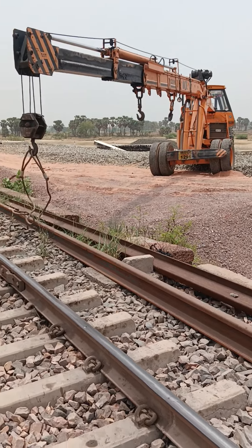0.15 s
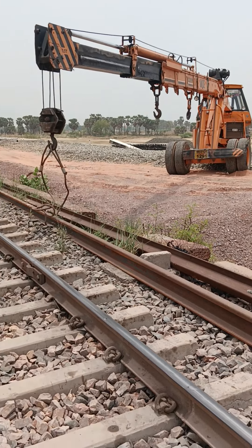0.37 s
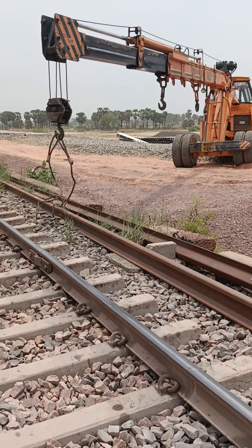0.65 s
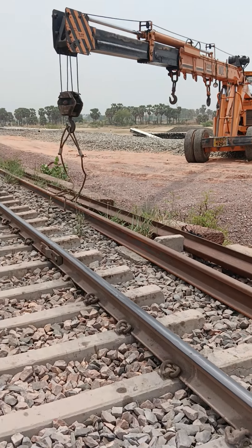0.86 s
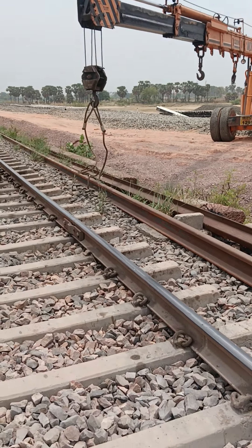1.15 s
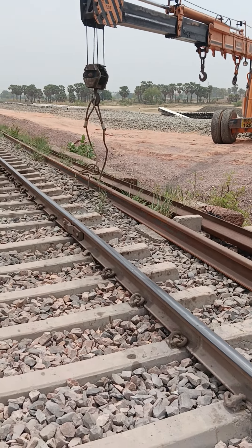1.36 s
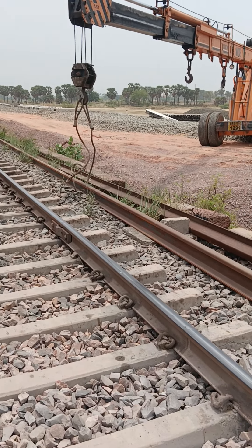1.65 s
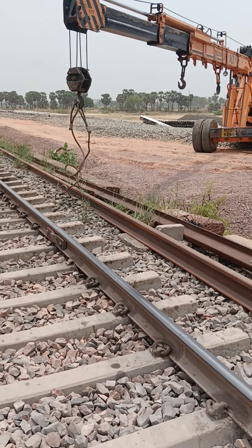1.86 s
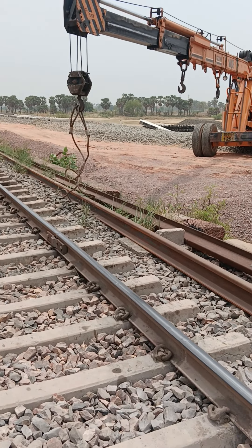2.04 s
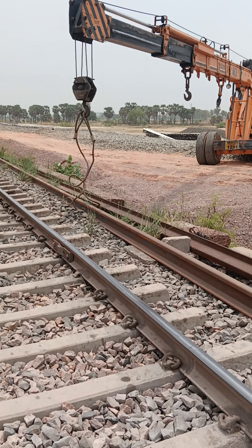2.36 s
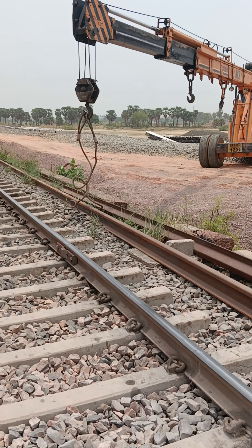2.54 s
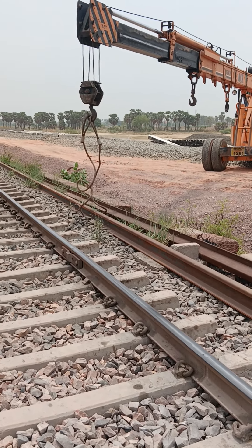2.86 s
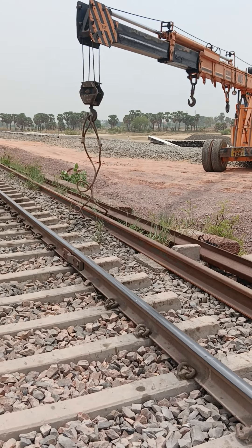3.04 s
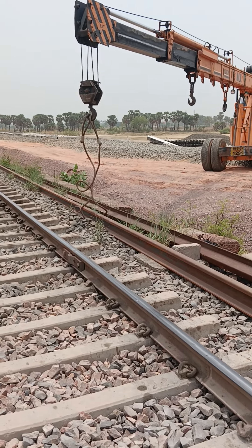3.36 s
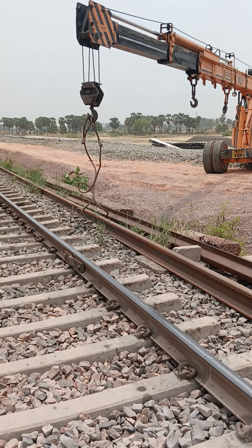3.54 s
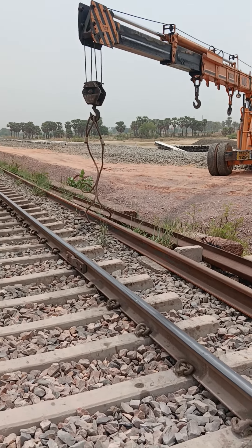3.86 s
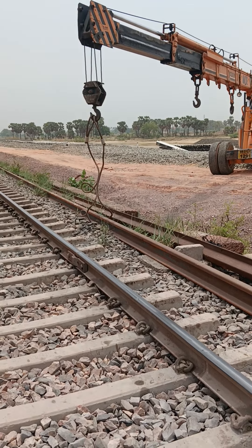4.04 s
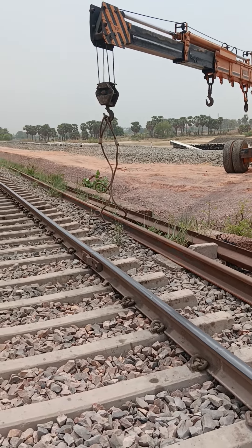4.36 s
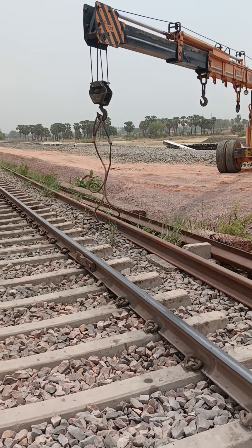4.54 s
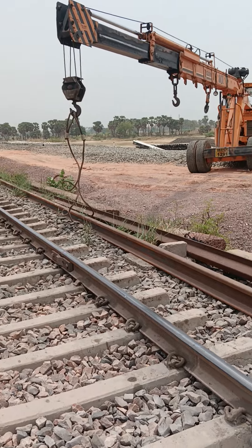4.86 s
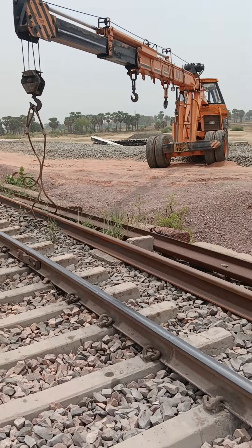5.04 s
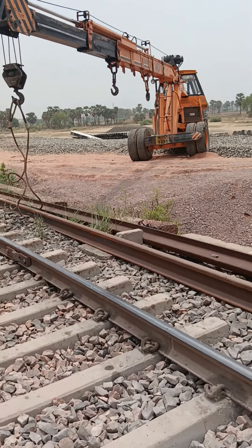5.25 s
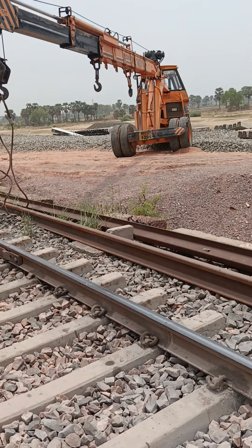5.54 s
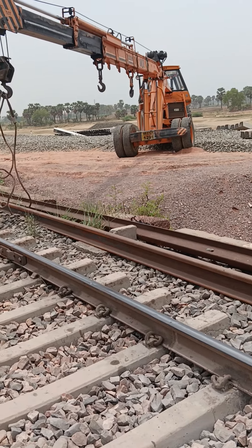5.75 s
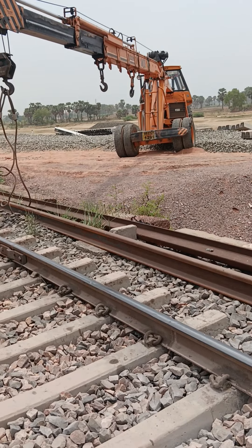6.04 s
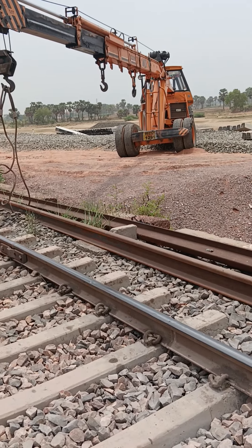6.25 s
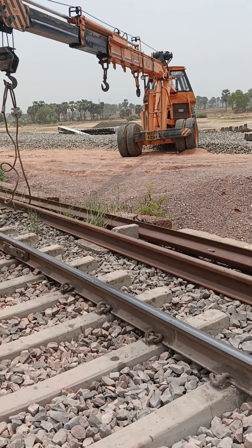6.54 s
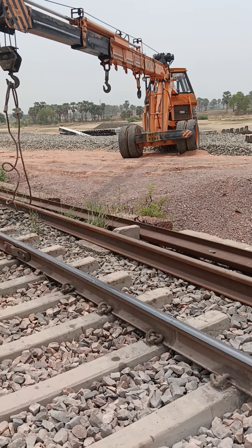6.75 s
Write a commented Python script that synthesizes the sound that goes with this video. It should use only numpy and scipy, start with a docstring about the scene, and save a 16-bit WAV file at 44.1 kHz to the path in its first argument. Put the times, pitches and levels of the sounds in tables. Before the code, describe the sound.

A four-cylinder diesel crane idles throughout, outdoors beside a railway track, somewhat to the right. A low exhaust hum near 74 Hz sits under fast, uneven knocking and ticking, about 37 bursts a second, with loose covers rattling. At 0.15-0.3 s gliding low wind puffs thump the left side, with a faint rustle and a soft dull bump at 0.3 s. At 1.05-1.25 s a ballast stone lands close by: a light touch, a very loud sharp crack at 1.07, a second clack at 1.19 and small tinks, dry and brief. Steady idling follows, with a thin high sizzle around 2-4 s, light wind, and occasional panel rings. A short rising metallic chirp comes at 4.5 s, then harder knocks at 4.7. Everything cuts to silence from 5.62 to 5.88 s, then the idle resumes with scattered knocks and rings until about 6.9 s.

```python
"""A four-cylinder crane diesel idles throughout: low exhaust sines under knocking, ticking bursts of noise.
Covers rattle throughout and ring now and then. A light wind buffets the two microphone ports;
early on, gliding low puffs and a soft bump stand out.
Just after one second a ballast stone clacks close by: sharp cracks with a brief modal ring and small tinks.
Later, a panel rings briefly with a rising tone, and the sound cuts out for a quarter of a second."""
import sys
import numpy as np
from scipy import signal
from scipy.fft import rfft, irfft, next_fast_len
from scipy.io import wavfile
from scipy.ndimage import uniform_filter1d, map_coordinates

SR = 44100
rng = np.random.default_rng(int(sys.argv[2]) if len(sys.argv) > 2 else 0)


def transcribe(u):
    """Save the signal u as a 16-bit wav file named by the first command-line argument.

    u: samples, shape (n,) or (channels, n), limited to [-1, 1]; the rate is SR.
    q: integer samples, one column per channel.
    """
    v = np.clip(np.atleast_2d(u).T, -1, 1)
    q = np.round(v * 32767).astype(np.int16)
    wavfile.write(sys.argv[1], SR, q)


N = 304192  # samples, about 6.9 s


def amp(db):
    """Decibels to gain."""
    return 10 ** (np.asarray(db) / 20)


def unit(x):
    """Scale to rms 1."""
    return x / np.sqrt(np.mean(x ** 2) + 1e-20)


def along(points, hz):
    """Read a curve of (frequency, value) points on a log frequency axis."""
    point_hz, value = np.transpose(points)
    return np.interp(np.log(hz + 1), np.log(point_hz + 1), value)


def clock():
    """The time of each sample in seconds."""
    return np.arange(N) / SR


def curves(rows):
    """One value per sample for each column after the time."""
    time_s, *columns = np.transpose(rows)
    return [np.interp(clock(), time_s, column) for column in columns]


def wobble(rate):
    """A smooth random curve with the given number of random knots a second."""
    knots = rng.standard_normal(int(N * rate / SR) + 4)
    return map_coordinates(knots, [np.arange(N) * rate / SR])


def coloured(x, gain_db, delay=0):
    """Filter x causally (minimum phase) by a dB curve over frequency, then delay it by some seconds."""
    m = 2 * next_fast_len(N // 2 + 8192)
    hz = np.fft.rfftfreq(m, 1 / SR)
    cepstrum = irfft(np.log(amp(gain_db(hz)) + 1e-6), m)
    # folding the cepstrum onto positive time gives the minimum phase
    cepstrum[1:m // 2] *= 2
    cepstrum[m // 2 + 1:] = 0
    response = np.exp(rfft(cepstrum) - 2j * np.pi * hz * delay)
    return irfft(rfft(x, m) * response, m)[..., :N]


def noise(spectrum, channels=2):
    """Unrelated noises with the given colour, scaled together to rms 1."""
    white = rng.standard_normal((channels, N))
    return unit(coloured(white, lambda hz: along(spectrum, hz)))


def even(x):
    """Noise with its own quick swells levelled out."""
    power = np.abs(uniform_filter1d(x ** 2, size=900, axis=-1))
    return x / np.sqrt(power + .02)


def fade(age_s, t60_s):
    """Exponential decay by 60 dB in t60_s."""
    return np.exp(-np.log(1000) * age_s / t60_s)


def decay(start_s, t60_s):
    """An envelope that jumps to 1 and dies away, down to a floor of -120 dB."""
    age = clock() - start_s
    return (age >= 0) * fade(np.clip(age, 0, 2 * t60_s), t60_s)


def swell(centre_s, half_s):
    """A bell-shaped envelope around a moment."""
    return np.exp(-((clock() - centre_s) / half_s) ** 2 / 2)


def fuzzy(hz, width_hz):
    """A narrow band of noise of rms 1 around a fixed or moving centre."""
    turn = 2 * np.pi * np.cumsum(hz * np.ones(N)) / SR
    return unit(wobble(width_hz) * np.sin(turn) + wobble(width_hz) * np.cos(turn))


# colour of the open-air background: pitch_hz, level_db
AIR_COLOUR = [(25, 1), (100, -2.5), (250, 1.5), (500, -5), (1400, -4), (3000, -7.5), (6500, -12.5),
              (9000, -24), (13500, -35), (15500, -26)]


def air(level_db=-60):
    """The open-air background is a steady coloured noise, unrelated at the two ports."""
    return amp(level_db) * noise(AIR_COLOUR)


# faint high rustles: centre_s, half_length_s, level_db
RUSTLE_MOVES = [(.281, .0031, -49.5), (.38, .008, -59), (1.24, .012, -65.5), (1.474, .0059, -54.5),
                (1.778, .02, -55.5), (4.68, .005, -63.5)]
# colour of the rustling: pitch_hz, level_db
RUSTLE_COLOUR = [(3000, -29), (9000, -8.5), (13000, -19.5), (15000, 1.5)]


def rustle():
    """Fingers shift lightly on the microphone case, catching unevenly: short swells of rough hiss."""
    moves = sum(amp(db) * swell(s, half) for s, half, db in RUSTLE_MOVES)
    return moves * unit(amp(4 * wobble(250)) * noise(RUSTLE_COLOUR))


# colour of the light breeze at the ports: pitch_hz, level_db
BREEZE_COLOUR = [(25, -26), (48, -24.5), (68, 7), (125, 2.5), (200, -5), (350, -13.5), (800, -62),
                 (3000, -100)]
# colour of the eddies on the puffs: pitch_hz, level_db
EDDY_COLOUR = [(25, -24), (48, -5), (70, -1.5), (130, 0), (200, -7.5), (350, -26), (800, -57.5),
               (3000, -100)]
# stronger puffs: centre_s, half_length_s, pitch_hz (before the glide), left_db, right_db, eddies_db (relative)
WIND_PUFFS = [(.157, 0.018, 84.8, -38.5, -57, -4), (0.218, 0.015, 74.5, -30.5, -56, -12),
              (0.245, 0.0085, 84, -30, -56, -9), (.275, .015, 130, -46, -63, 0),
              (1.235, .008, 97.2, -35, -49, -13), (1.277, 0.02, 75.75, -33, -44, -9.5),
              (1.308, 0.0068, 109.9, -31.5, -48, -4), (2.25, .04, 110, -63, -55, 1),
              (2.864, .06, 115, -65, -50, -2), (3.904, 0.013, 133.8, -63, -43, 0.5),
              (4.071, 0.017, 105, -56, -54, 1.5), (4.223, 0.018, 171, -64, -57, 0),
              (5.209, .01, 110, -58, -51, 6.5), (5.268, 0.0087, 124.3, -56, -48.5, -2),
              (6.378, 0.012, 105, -41.5, -68, -1.5), (6.523, .016, 120.7, -59, -52.5, 0.5)]


def wind(left_db=-62, right_db=-58, lumps_db=3.0, shared=0.54, glide=0.113, glide_rate=45):
    """A light breeze buffets each port separately; single puffs are gliding low surges with eddies on them."""
    lumps = amp(lumps_db * np.array([wobble(13), wobble(7.3)]))
    breeze = amp([[left_db], [right_db]]) * lumps * noise(BREEZE_COLOUR)
    # the eddies are partly common to both ports
    eddies = even(unit(noise(EDDY_COLOUR) + shared * noise(EDDY_COLOUR, channels=1)))
    turn_per_hz = 2 * np.pi * np.cumsum(1 + glide * wobble(glide_rate)) / SR
    puffs = np.zeros((2, N))
    for s, half, hz, puff_left_db, puff_right_db, eddy_db in WIND_PUFFS:
        surge = np.sqrt(2) * np.sin(hz * turn_per_hz) + amp(eddy_db) * eddies
        puffs += amp([[puff_left_db], [puff_right_db]]) * swell(s, half) * surge
    return breeze + puffs


# colour of a dull bump on the case: pitch_hz, level_db
BUMP_COLOUR = [(40, -6.5), (120, -1), (300, 0.5), (420, -14), (650, -60), (2000, -74)]


def bump(db=-28.5, right_db=-15, start_s=.3145, rise_s=0.011):
    """A soft knock on the case beside the left port: a dull noise that rises quickly and dies away."""
    envelope = decay(start_s, t60_s=0.14) * (1 - decay(start_s, t60_s=rise_s)) ** 2
    return amp(db) * amp([[0], [right_db]]) * envelope * even(noise(BUMP_COLOUR))


# nudged neighbouring stones: start_s, pitch_hz, level_db, t60_s
PEBBLE_TINKS = [(1.089, 3950, -42, .03), (1.093, 1320, -40, .1), (1.148, 2230, -43, .03),
                (1.151, 4390, -46.5, 0.043), (1.189, 2330, -34.5, .03), (1.213, 2480, -45, 0.12),
                (1.24, 3710, -50.5, .08), (1.262, 2560, -52, .05)]


def pebbles(attack_s=.001, left_db=0):
    """Neighbouring stones, nudged by the landing one, tink softly: each is one short decaying sine."""
    tinks = np.zeros(N)
    for s, hz, db, t60 in PEBBLE_TINKS:
        attack = 1 - decay(s, np.log(1000) * attack_s)
        tinks += amp(db) * decay(s, t60) * attack * np.sin(2 * np.pi * hz * clock())
    return amp([[left_db], [0]]) * tinks


# the stone lands, hops and settles: start_s, level_db, lowest_hz, brightest_hz, then relative to level_db:
# ring_db, scatter_db (from the ballast), thud_db (of the bed)
STONE_CONTACTS = [(1.0495, -34, 400, 3010, 1, -21, -15), (1.0732, -10.5, 200, 7470, -2, -28.5, -34),
                  (1.1894, -19, 1200, 3900, -5.5, -27, -25.5), (1.2055, -27, 2000, 3900, -2.5, -16, -34),
                  (1.233, -41.5, 2100, 2700, 2, -16, -29)]
# ring of the stone: pitch_hz, level_db (relative), t60_s
STONE_MODES = [(482, -37, .07), (680, -32, 0.067), (1340, -20.5, 0.031), (2010, -25, 0.043),
               (2316, -13, .03), (2946, -12, .026), (3280, -20.5, .024), (3520, -20.5, .028),
               (3830, -14, .02), (3950, -18.5, .02), (4183, -20, 0.019), (4880, -13, .02),
               (4930, -11.5, 0.019), (5600, -20.5, .019), (5935, -17.5, .022), (7310, -31, 0.02),
               (11300, -7, 0.039), (14300, 9.5, .0248)]
# colour of crack and grit: pitch_hz, level_db
CRACK_COLOUR = [(200, -37), (1000, -31.5), (2200, -9), (2620, -13.5), (3200, 3.5), (4200, -2),
                (5200, -10.5), (6500, -10), (8000, -19), (10000, -26), (15000, -28.5)]
# colour of the scatter from the ballast: pitch_hz, level_db
BALLAST_COLOUR = [(200, -15.5), (500, -0.5), (1300, 2), (2600, 1.5), (4000, -7), (6000, -0.5),
                  (9000, -37.5), (15000, -42.5)]


def stone(crack_db=0, grit_db=-21, lag_s=0.001385, thud_hz=560, thud_t60_s=.035):
    """Each contact is a sharp crack, crushed grit and a brief ring; the ballast thuds and scatters it back."""
    out = np.zeros((2, N))
    t = np.arange(SR // 5) / SR
    crack = coloured(signal.unit_impulse(N), lambda hz: along(CRACK_COLOUR, hz))[:len(t)]
    crack = amp(crack_db) * crack / np.abs(crack).max()
    grit = amp(grit_db) * noise(CRACK_COLOUR)
    scatter = noise(BALLAST_COLOUR) * amp(2.3 * wobble(300))
    scatter_envelope = (t / 0.02 * np.exp(1 - t / 0.016)) ** 3  # the answer builds up, then dies
    for s, db, low_hz, bright_hz, ring_db, scatter_db, thud_db in STONE_CONTACTS:
        span = slice(round(s * SR), round(s * SR) + len(t))
        ring = np.zeros((2, len(t)))
        for hz, mode_db, t60 in STONE_MODES:
            gain = amp(mode_db + rng.normal(0, 1, (2, 1)))
            ring += gain * fade(t, t60) * np.sin(2 * np.pi * (hz * t + rng.random()))
        tail = amp(ring_db) * ring + fade(t, 0.055) * grit[:, span]
        hit = crack + tail * (1 - fade(t, 0.0035))
        hit = hit + amp(scatter_db) * scatter[:, span] * scatter_envelope
        # each contact has its own dullness and thinness
        dull = signal.butter(5, np.clip(bright_hz, 500, SR / 2 - 1), fs=SR, output="sos")
        thin = signal.butter(1, low_hz, "high", fs=SR, output="sos")
        out[:, span] += amp(db) * signal.sosfilt(np.vstack([dull, thin]), hit)
        thud = fade(t, thud_t60_s) * np.sin(2 * np.pi * thud_hz * t)
        out[:, span] += amp(db + thud_db) * thud
    # the left port is farther away and shaded from the treble
    shade = [(1400, 2.0), (5000, 0.5), (7500, -5.5)]
    left = coloured(out[0], lambda hz: along(shade, hz), delay=lag_s)
    return np.array([left, out[1]])


def panel_chirp(start_s=4.535, half_s=0.019, hz=1110, rise_hz_per_s=2500, db=-45):
    """A panel rings briefly with a rising, trembling tone: one swelling sine centred on start_s."""
    pitch_hz = hz + rise_hz_per_s * (clock() - start_s) + 85 * wobble(300)
    turn = 2 * np.pi * np.cumsum(pitch_hz) / SR
    return amp(db) * swell(start_s, half_s) * np.sqrt(2) * np.sin(turn)


# thin bands of high rattle: pitch_hz, width_hz, level_db (before the curve below)
SIZZLE_BANDS = [(4590, 240, -73.5), (9350, 170, -83)]
# common level of those bands: time_s, level_db
SIZZLE_CURVE = [(1.3, -14), (1.9, 0), (3.8, 1), (4.5, -25)]


def sizzle(firings, throb=0.41):
    """Thin, high bands of rattle pulse with the firings."""
    bands = sum(amp(db) * fuzzy(hz, width_hz=width) for hz, width, db in SIZZLE_BANDS)
    return amp(curves(SIZZLE_CURVE)[0]) * bands * (1 + throb * np.sin(2 * np.pi * firings))


# broad colour of the clatter: pitch_hz, level_db
BLOCK_COLOUR = [(40, -16), (120, -11.5), (230, -7.5), (400, -2.5), (620, 9.5), (1200, -7), (1800, 2),
                (3000, 0.5), (5000, -12), (7200, -20), (9000, -20.5), (13500, -38), (15400, -43)]
# resonances of block and covers: pitch_hz, width_hz, boost_db
PANEL_RESONANCES = [(786, 22, 10), (1001.4, 78, 14.5), (1346, 156, 20.5), (1608, 50, 9.5), (1993, 33, 8),
                    (2642, 120, 8), (3260, 54, 4.5), (3740, 66, 8), (4040, 120, 8), (4430, 69, 7.5),
                    (6180, 70, 4), (6524, 1180, 8)]


def body(hz):
    """The colour of the engine block in dB, with its ringing covers as bell-shaped peaks."""
    peaks = sum(db * np.exp(-((hz - c) / w) ** 2 / 2) for c, w, db in PANEL_RESONANCES)
    return along(BLOCK_COLOUR, hz) + peaks


def rattle(count=700, db=-54, spread_db=1.4):
    """Loose covers and fittings tap at random, each tap ringing near one of the panel resonances."""
    t = np.arange(SR // 16) / SR
    out = np.zeros(N + len(t))
    for when, which, detune, size in rng.random((count, 4)):
        hz = PANEL_RESONANCES[int(which * len(PANEL_RESONANCES))][0] * (1 + 0.133 * (detune - .5))
        colour_db = along([(800, -2.5), (1400, -0.5), (2000, 6), (6400, -5.5)], hz)
        size_db = -spread_db * np.log(1 - .9 * size)  # many small taps, few large ones
        tap = np.sin(2 * np.pi * hz * t) * fade(t, 0.052) * (1 - np.exp(-t / 0.0012))
        out[int(when * N):][:len(t)] += amp(db + colour_db + size_db) * tap
    return out[:N]


# strongest band of the clatter, shifting as the microphone moves: time_s, centre_hz, level_db
MOVING_BAND = [(0, 1378, -74), (3.4, 1563, -80), (4.4, 1622, -54), (5.2, 1346, -55), (6.0, 1382, -53),
               (6.5, 1393, -47), (6.9, 1405, -50.5)]
# a loose panel rings out now and then: centre_s, half_length_s, pitch_hz, level_db
PANEL_RINGS = [(0.478, 0.018, 972, -44), (0.68, 0.018, 1004, -45), (1.963, 0.038, 987, -49.5),
               (3.588, .04, 792, -52.5), (3.85, 0.2, 2666, -55.5), (4.292, 0.024, 1646, -44),
               (6.123, 0.028, 1003, -45.5), (6.389, 0.011, 3270, -50.5), (6.43, 0.025, 3730, -55)]


def rings(firings, throb=0.28):
    """Shaken panels answer with fuzzy bands around their resonances, throbbing with the firings."""
    centre_hz, band_db = curves(MOVING_BAND)
    steady = amp(band_db) * fuzzy(centre_hz, width_hz=210)
    loose = sum(amp(db) * swell(s, half) * fuzzy(hz, width_hz=140) for s, half, hz, db in PANEL_RINGS)
    return (steady + loose) * (1 + throb * np.sin(2 * np.pi * firings))


# harder knocks of the engine: start_s, level_db, treble_tilt_db
HARD_KNOCKS = [(.129, -39, -17), (2.354, -43, -1), (2.755, -43.5, 3), (4.054, -43, -14), (4.382, -43.5, 0),
               (4.676, -37.5, -9.5), (4.709, -38.5, -12), (4.819, -46.5, -21), (5.068, -43.5, 2),
               (5.902, -51, 3.5), (6.142, -45.5, -10), (6.327, -42, -14), (6.43, -49, -1),
               (6.54, -42.5, -1), (6.647, -42, -7)]


def knocks(treble_hz=2200, top_hz=7000, blow=9, t60_s=0.056):
    """Now and then one blow stands out of the clatter and rings the same block."""
    blows = np.zeros(N)
    blows[[round(s * SR) for s, db, tilt_db in HARD_KNOCKS]] = blow
    ring = unit(coloured(rng.standard_normal(N) + blows, body))
    low = signal.sosfilt(signal.butter(1, treble_hz, fs=SR, output="sos"), ring)
    treble = ring - low
    struck = sum(amp(db) * decay(s, t60_s) * (low + amp(tilt_db) * treble) for s, db, tilt_db in HARD_KNOCKS)
    return signal.sosfilt(signal.butter(2, min(top_hz, SR / 2 - 1), fs=SR, output="sos"), struck)


def impacts(per_s, spread_db):
    """Separate small blows at random times, of uneven size and either sign, rms 1."""
    struck = rng.random(N) < per_s / SR
    sign = np.sign(rng.standard_normal(N))
    return unit(struck * sign * amp(spread_db * rng.standard_normal(N)))


# strength of each cylinder's bursts in firing order: level_db (relative)
CYLINDER_STRENGTH = [-6.5, -6, -1.5, -6.5]


def bursts(firings, life, bed, scatter_db, grain_db, churn=0.69):
    """Every firing sets off a swelling, dying burst of small impacts over the steady churn of the gears."""
    number = firings.astype(int)
    age = firings % 1  # in firing periods, as is life
    uneven_db = scatter_db * rng.standard_normal(512)[number]
    strength = amp(np.take(CYLINDER_STRENGTH, number, mode="wrap") + uneven_db)
    envelope = unit(bed + strength * np.exp(-age / life) * (1 - np.exp(-age / .1)))
    grains = impacts(per_s=1100, spread_db=1.5) + churn * rng.standard_normal(N)
    return envelope * amp(grain_db * wobble(450) + 0.94 * wobble(14)) * grains


def patchy(x, fast_db, slow_db):
    """Each band swells on its own: quickly as parts rattle, slowly as the sound paths shift."""
    spectrogram = signal.stft(x, nperseg=1024)[2]

    def field(frames):
        """Random gains smoothed over neighbouring bands and some frames, rms 1."""
        g = rng.standard_normal(spectrogram.shape)
        for _ in range(2):
            g = uniform_filter1d(uniform_filter1d(g, size=4, axis=0), size=frames, axis=1)
        return unit(g)

    gain = amp(fast_db * field(4) + slow_db * field(36))
    return signal.istft(spectrogram * gain, nperseg=1024)[1][:N]


def clatter(firings, knock_db, tick_db, split_hz=2200):
    """Combustion knock rings the block's low resonances, injectors and valves the high ones."""
    def low_body(hz):
        """The block's colour below the split, in dB."""
        return body(hz) - 10 * np.log10(1 + (hz / split_hz) ** 8)

    def high_body(hz):
        """The block's colour above the split, in dB."""
        return body(hz) - 10 * np.log10(1 + (split_hz / (hz + 1)) ** 8)

    knock = coloured(bursts(firings, life=.35, bed=.5, scatter_db=1.8, grain_db=1), low_body)
    tick = coloured(bursts(firings, life=.35, bed=.65, scatter_db=1.6, grain_db=.8), high_body)
    mixed = amp(knock_db) * unit(knock) + amp(tick_db) * unit(tick)
    return patchy(mixed, fast_db=2.0, slow_db=1.18)


# exhaust lines: multiple (of the firing rate), level_db (rms, before flutter, surges and the hum's level)
EXHAUST_LINES = [(2, -53), (3, -82.5), (4, -67), (5, -61), (5.5, -66), (6, -90), (7, -84), (7.5, -77),
                 (8, -67), (8.5, -77), (9, -76), (10, -72)]
# low wind surges near 74 Hz at either port, blending with the hum's lowest line:
# centre_s, half_length_s, left_rise_db, right_rise_db
WIND_SURGES = [(0.156, 0.045, 15.5, -2), (0.666, 0.024, 14.5, 4), (2.273, 0.04, 1, 12.5),
               (2.88, 0.12, 5, 7), (4.235, 0.038, 3.5, 12.5), (4.99, .06, 11, 5)]


def hum(firings, flutter_db=0.8, sway_rad=0.039):
    """Exhaust pulses make low lines on the firing rate; low wind surges at either port blend with the lowest."""
    turn = 2 * np.pi * firings + sway_rad * wobble(6.4)
    lines = []
    for multiple, db in EXHAUST_LINES:
        level = amp(db + flutter_db * wobble(6.9))
        lines.append(level * np.sin(multiple * turn + rng.uniform(0, 2 * np.pi)))
    lowest, *upper = lines
    # the surges are made by raising the lowest line
    surge_db = sum(np.array([[left], [right]]) * swell(s, half) for s, half, left, right in WIND_SURGES)
    return np.sqrt(2) * (amp(surge_db) * lowest + sum(upper))


# the governor holds the idle almost steady: time_s, firing_rate_hz (before the random wander)
IDLE_SPEED = [(0, 36.9), (2.2, 37.1), (3.0, 36.85), (5.0, 37.0), (5.6, 37.8), (6.9, 37.5)]
# the clatter as the microphone turns: time_s, knock_db, tick_db
CLATTER_LEVEL = [(0, -49, -55.5), (2.6, -50, -55), (4.1, -50.5, -55.5), (4.7, -49.5, -57.5),
                 (5.5, -51.5, -56.5), (6.5, -51.5, -55), (6.9, -51.5, -57)]
# slow level of the hum: time_s, level_db
HUM_CURVE = [(0, 1.5), (.9, 0), (1.15, -3), (1.5, 1), (2.2, -1), (2.95, -1), (3.6, -0.5), (4.25, -2),
             (4.33, -4.5), (4.57, -2), (4.8, -10), (4.93, -1.5), (5.13, -4), (6.0, -3), (6.9, -1.5)]
# how much later the engine reaches the left port as the microphone turns: time_s, delay_ms
LEFT_PORT_LAG = [(0, .835), (.7, 0.8), (1.7, 0.82), (2.6, 0.83), (3.7, 0.85), (4.6, 0.81), (5.3, 0.788),
                 (6.1, 0.79), (6.9, .82)]
# colour of the right port against the left: pitch_hz, level_db
RIGHT_PORT_COLOUR = [(230, -7), (380, -18.5), (510, -9.5), (780, -4.5), (980, -14), (1270, -9.5),
                     (1650, -13), (1950, -7), (2330, -15.5), (2700, -6), (3200, -1), (4000, -2), (4450, 1),
                     (4800, -4.5), (7000, -1), (9000, -3.5), (15000, -14)]


def engine(right_hum_db=-3, hunt_hz=0.304, hunt_rate=4):
    """The engine stands to the right, so its hum and metal reach the left port later."""
    firing_rate = curves(IDLE_SPEED)[0] + hunt_hz * wobble(hunt_rate)
    firings = np.cumsum(firing_rate) / SR  # running count
    knock_db, tick_db = curves(CLATTER_LEVEL)
    exhaust = amp(curves(HUM_CURVE)[0]) * hum(firings)
    metal = clatter(firings, knock_db, tick_db) + knocks() + rings(firings)
    metal = metal + sizzle(firings) + rattle() + panel_chirp()
    heard_at = (clock() - curves(LEFT_PORT_LAG)[0] / 1000) * SR
    left = map_coordinates(exhaust[0] + metal, [heard_at], order=5)
    right_colour = [(70, right_hum_db)] + list(RIGHT_PORT_COLOUR)
    right = coloured(exhaust[1] + metal, lambda hz: along(right_colour, hz))
    return np.array([left, right])


def scene():
    """Engine, wind, stones and small knocks over the open-air background."""
    return engine() + wind() + bump() + stone() + pebbles() + rustle() + air()


# the brief cut-out: start_s, end_s
CUT_OUT = (5.621, 5.878)


def record(dry, top_hz=15850):
    """The sound cuts out briefly, and nothing is kept above the band limit."""
    live = (clock() < CUT_OUT[0]) | (clock() > CUT_OUT[1])
    m = next_fast_len(N + SR // 2)
    passed = np.fft.rfftfreq(m, 1 / SR) < top_hz
    return irfft(rfft(dry * live, m) * passed, m)[:, :N]


dry = scene()
out = record(dry)
transcribe(out)
```